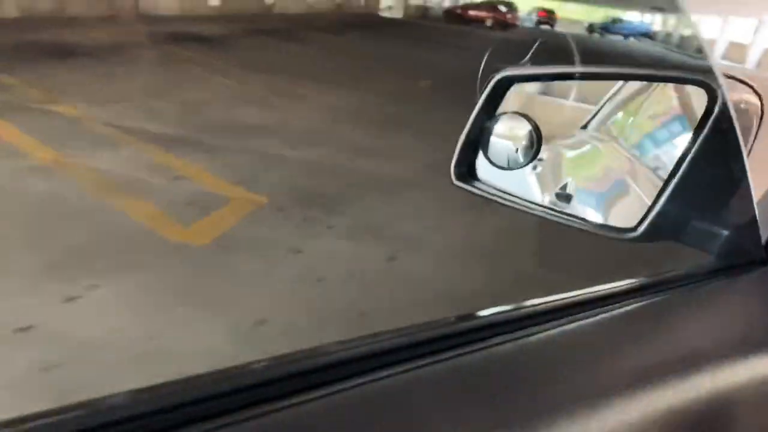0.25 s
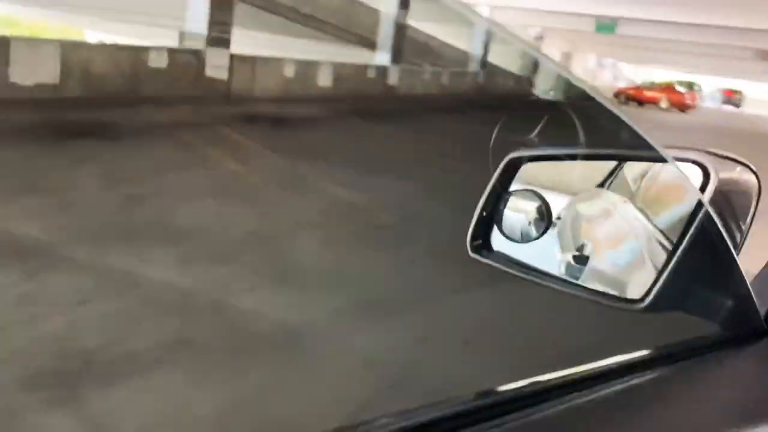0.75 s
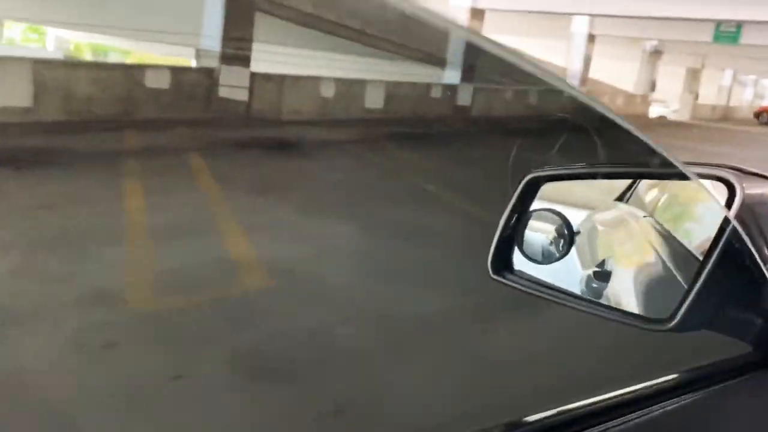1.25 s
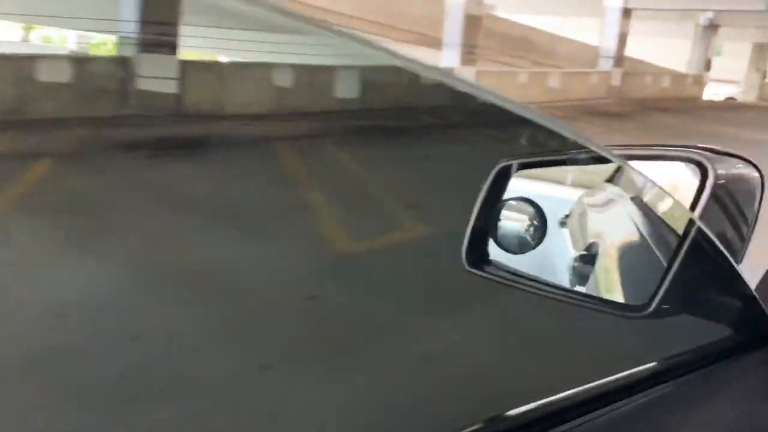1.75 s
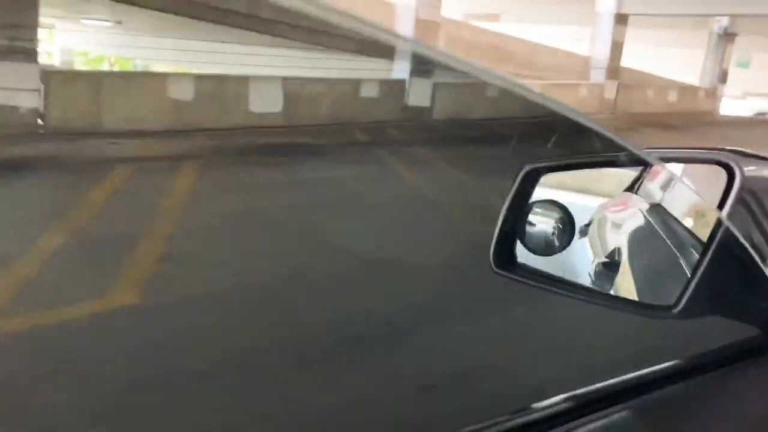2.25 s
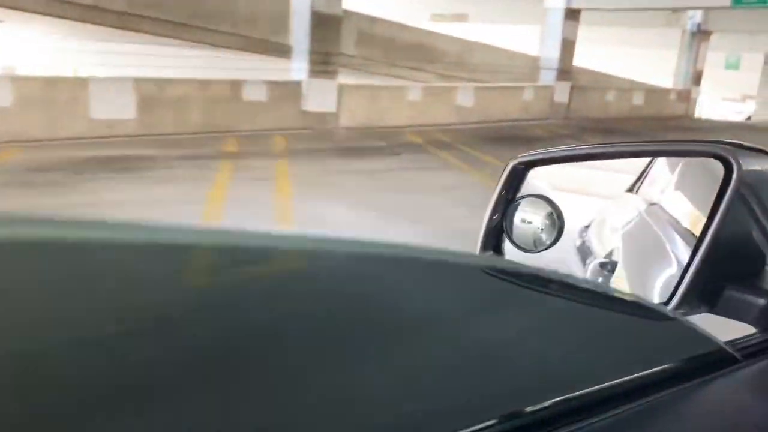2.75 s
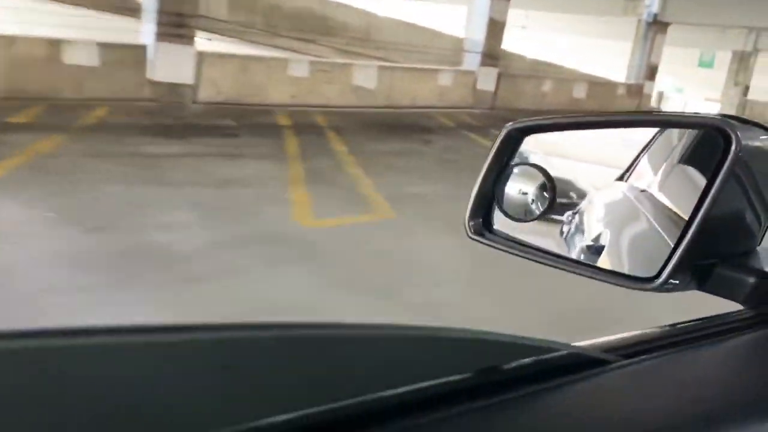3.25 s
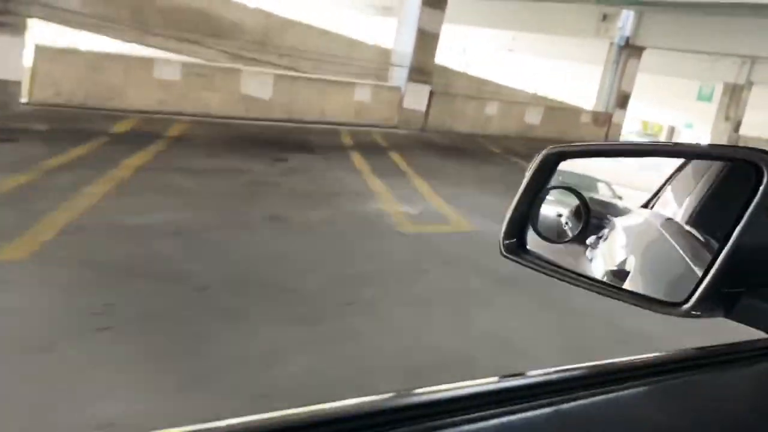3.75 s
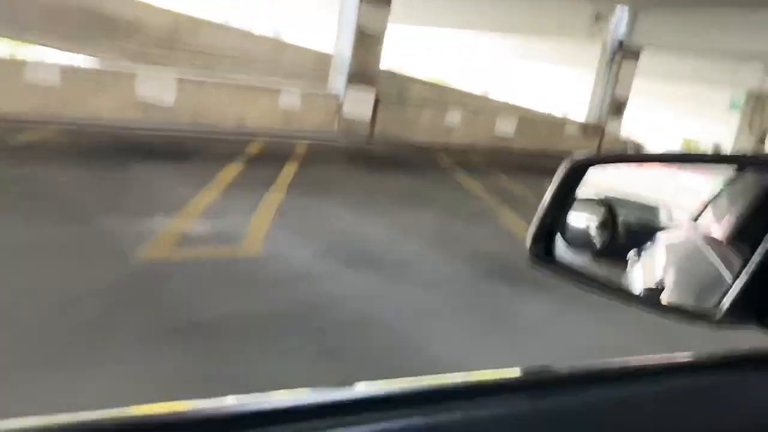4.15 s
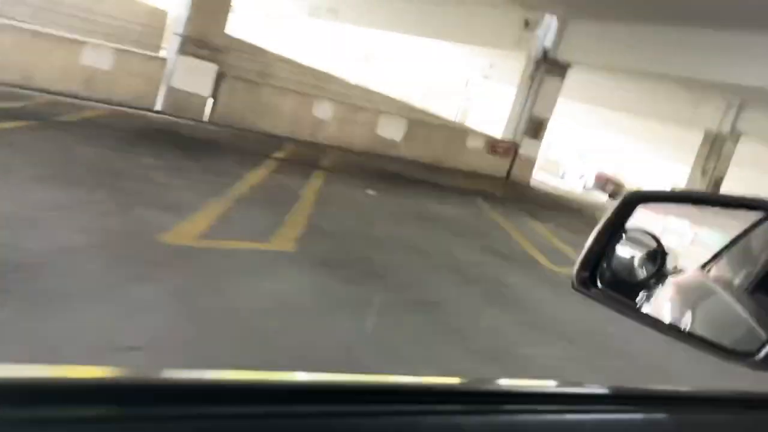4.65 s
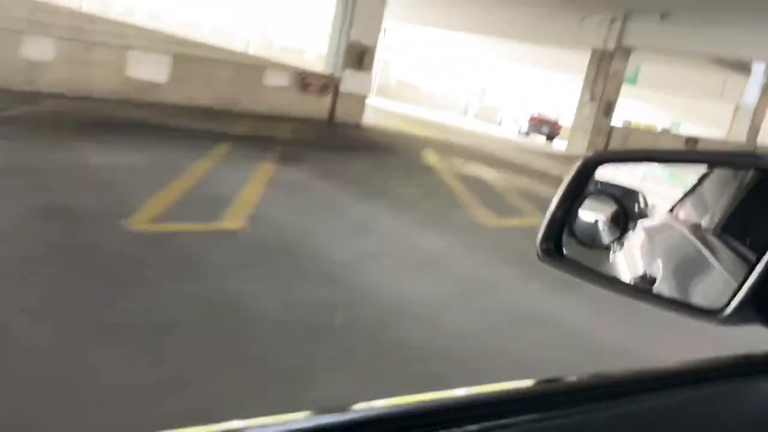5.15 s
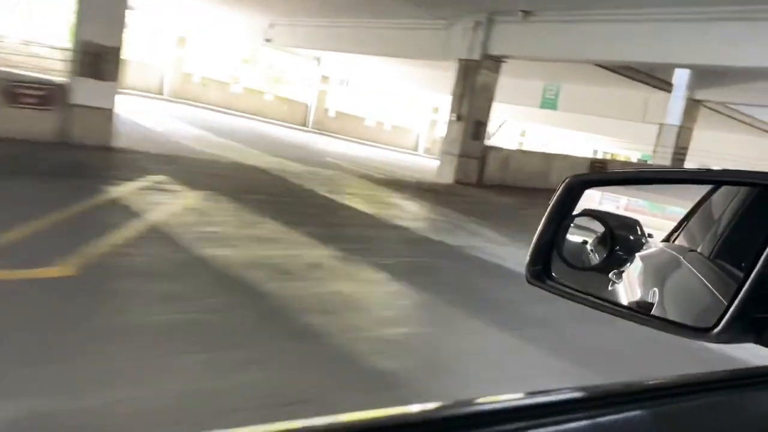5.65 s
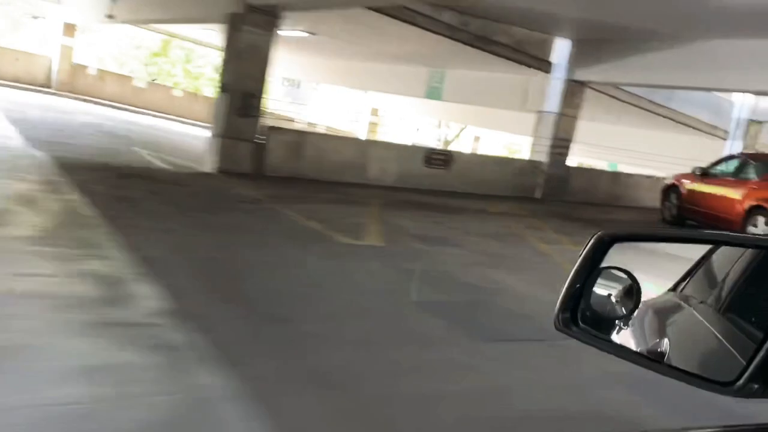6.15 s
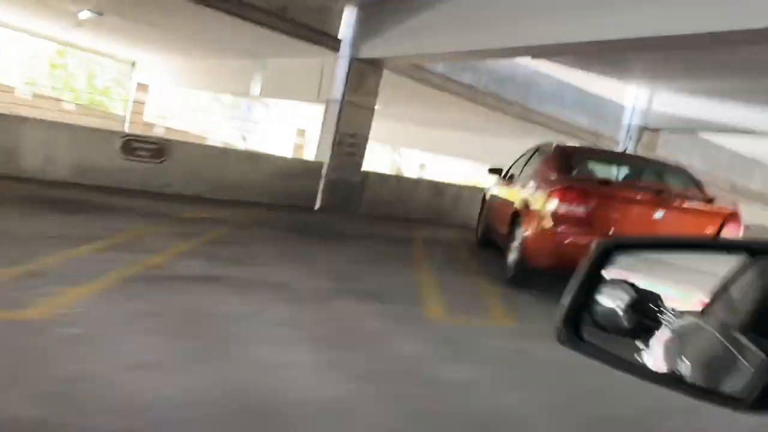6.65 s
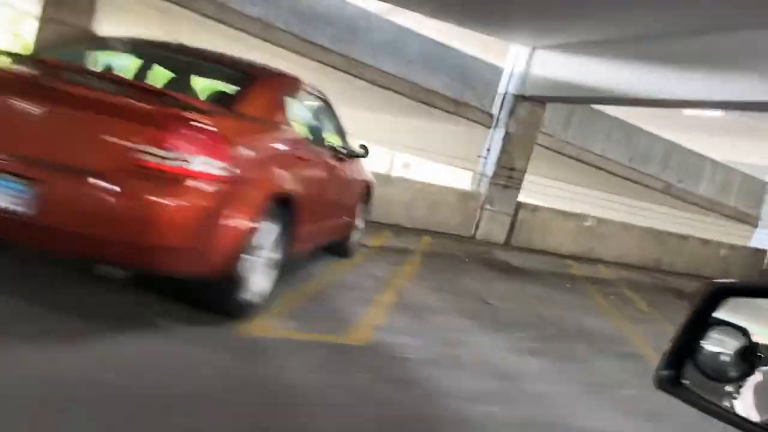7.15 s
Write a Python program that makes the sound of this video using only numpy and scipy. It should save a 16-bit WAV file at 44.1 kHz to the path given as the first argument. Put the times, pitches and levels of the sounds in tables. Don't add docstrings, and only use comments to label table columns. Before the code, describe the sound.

A close stereo microphone in the cabin first catches irregular wind-like thumps over a low, muffled car engine. A few plastic clicks follow and the window opens, making the sound brighter and wider. The exhaust note climbs steadily with roaring gas and rumbling tyres, peaks off the concrete walls as a pillar whooshes past, softens as the throttle lifts, then growls again while slowly dropping in pitch.

```python
import sys
import numpy as np
from scipy import signal
from scipy.fft import rfft, irfft, next_fast_len
from scipy.io import wavfile

SR = 44100
rng = np.random.default_rng(int(sys.argv[2]) if len(sys.argv) > 2 else 0)


def generate_wav(sig):
    pcm = np.round(np.clip(np.atleast_2d(sig).T, -1, 1) * 32767).astype(np.int16)
    wavfile.write(sys.argv[1], SR, pcm)


def makeup_ratio(level_db):
    decades = np.asarray(level_db, float) / 20
    return 10 ** decades


N = 325884
TIME_S = np.arange(N) / SR
SEAL_S, OPEN_S, DOWN_S = 2.17, 3.393, 3.66


def rms_one(x):
    return x / np.sqrt(np.mean(x ** 2) + 1e-20)


def in_time(rows):
    s, *columns = np.transpose(rows)
    return [np.interp(TIME_S, s, column) for column in columns]


def passing_db(events):
    return sum(db * np.exp(-((TIME_S - s) / half_s) ** 2) for s, db, half_s in events)


def drift(rate_hz):
    step = 40
    r = np.exp(-2 * np.pi * rate_hz * step / SR)
    points = rng.standard_normal(N // step + 2002)
    slow = signal.lfilter([1], [1, -2 * r, r * r], points)[2000:]
    return np.interp(np.arange(N) / step, np.arange(len(slow)), rms_one(slow))


def resonance(x, hz, width_hz):
    r = np.exp(-np.pi * width_hz / SR)
    ringing = [1, -2 * r * np.cos(2 * np.pi * hz / SR), r * r]
    return signal.lfilter(np.array([1, 0, -1]) * (1 - r * r) / 2, ringing, x)


def coloured(spectrum):
    hz, db = np.transpose(spectrum)
    size = next_fast_len(N)
    octave = np.log2(np.maximum(np.fft.rfftfreq(size, 1 / SR), 1))
    beyond = np.maximum(np.log2(hz[0]) - octave, 0) + np.maximum(octave - np.log2(hz[-1]), 0)
    shape = makeup_ratio(np.interp(octave, np.log2(hz), db) - 26.5 * beyond)
    return rms_one(irfft(rfft(rng.standard_normal((2, size))) * shape, size)[:, :N])


def pop(start_hz, t60_s, rattle):
    t = np.arange(SR // 20) / SR
    turn = 2 * np.pi * np.cumsum(150 + start_hz * np.exp(-t / .003)) / SR
    thud = np.sin(turn) * (1 - np.exp(-t / .003)) * makeup_ratio(-60 * t / t60_s)
    edge = rattle * makeup_ratio(-60 * t / 0.051)
    for _ in range(2):
        edge = resonance(edge, start_hz, 820)
    return thud / np.abs(thud).max() + makeup_ratio(-14) * edge / np.abs(edge).max()


# (time [s], peak level [dB])
POPS = [(0.014, -22), (0.079, -20.5), (0.105, -22.5), (0.117, -24.5), (0.158, -15), (0.19, -29),
        (0.216, -26), (0.253, -24), (0.318, -30), (0.369, -15.5), (0.4, -25.5), (0.551, -19),
        (0.561, -22.5), (0.713, -22.5), (0.783, -23.5), (0.819, -20), (0.874, -23), (0.889, -17.5),
        (0.991, -22), (1.022, -20.5), (1.049, -24.5), (1.068, -21), (1.301, -23.5), (1.319, -28),
        (1.44, -24.5), (1.444, -20.5), (1.711, -30.5), (2.147, -19.5), (2.656, -37), (2.783, -27)]


def air():
    length = SR // 20
    out = np.zeros(N + SR)
    for (s, db), rattle in zip(POPS, rng.standard_normal((len(POPS), length))):
        start = round(s * SR)
        out[start:start + length] += makeup_ratio(db - 1.5) * pop(767, 0.05, rattle)
    flutter_per_s, fade_s = 45, 1.2
    born = rng.random(N) < flutter_per_s * np.exp(-(TIME_S / fade_s) ** 2) / SR
    sizes = makeup_ratio(-45 + 7.0 * np.minimum(rng.exponential(1, N), 2)) * rng.choice([-1, 1], N)
    small_pop = pop(706, 0.095, rng.standard_normal(length))
    return out[:N] + signal.fftconvolve(born * sizes, small_pop)[:N]


# (time [s], firing rate [Hz], throttle level [dB], gas flow level [dB])
ENGINE = [(0, 42.93, 3, 2.5), (1.5, 43.5, -1.5, 4.5), (2.95, 43.63, 0.5, 4.5), (3.36, 47.16, -2.5, -9),
          (3.56, 49.03, -2, 4), (4.25, 58.3, -1.5, 0.5), (4.68, 63.68, 1, 2), (4.9, 67.88, 2, 9.5),
          (5.32, 79, 4, 7.5), (5.56, 80.87, 1, 11), (5.88, 102.8, -1, 13), (6.08, 106.3, 5, 10.5),
          (6.4, 100.5, -6, -4.5), (6.83, 100.1, -9, -12), (6.91, 99, 1, -4), (7.15, 95, 2.5, 0.5),
          (7.32, 88.7, 5, 4.5), (7.39, 85.65, 3.5, 2.5)]


def engine():
    firing_hz, throttle_db, flow_db = in_time(ENGINE)
    lag_s = .11
    keep = np.exp(-1 / (lag_s * SR))
    return firing_hz, throttle_db, signal.lfilter([1 - keep], [1, -keep], flow_db)


def octaves_up():
    firing_hz = engine()[0]
    return np.log2(firing_hz / firing_hz[0])


# (frequency [Hz], level per Hz [dB])
RUMBLE = [(12, -66.5), (20, -32.5), (41, 0.5), (60, 9), (91, 7), (109, 8), (150, 4.5), (319, -8.5),
          (400, -29), (520, -56), (880, -120)]
# (frequency [Hz], level per Hz [dB])
HISS = [(4500, 1), (6500, -1.5), (8000, -4.5), (10000, -3.5), (12000, -15), (14000, -5.5), (15900, -9.5)]
# (time [s], level [dB], half length [s])
BUMPS = [
    (0.356, 4.5, 0.12),
    (2.758, 0.5, .1),
    (4.052, 2, 0.065),
    (5.474, 8, 0.054),
    (6.256, -5.5, 0.2),
    (7.302, 7.5, .15),
]
# (time [s], level [dB], half length [s])
SWISHES = [
    (0.863, 6, 0.1),
    (5.04, -3, .12),
    (6.007, 16, 0.15),
    (7.385, 11.5, 0.011),
]


def road():
    unsealed, speed = TIME_S > SEAL_S, octaves_up()
    rumble_db = -29 + 2 * speed + 5 * unsealed + passing_db(BUMPS) + 2.3 * drift(7.6)
    hiss_db = -64.5 + 7.5 * speed + 4 * unsealed + passing_db(SWISHES) + .8 * drift(11)
    return makeup_ratio(rumble_db) * coloured(RUMBLE) + makeup_ratio(hiss_db) * coloured(HISS)


def window():
    gap = np.clip((TIME_S - SEAL_S) / (OPEN_S - SEAL_S), 0, 1)
    shut_db = -14
    return shut_db * (1 - gap ** 2.83)


def layer_db(db, window_share, throttle_share, flow_share):
    _, throttle_db, flow_db = engine()
    return db + window_share * window() + throttle_share * throttle_db + flow_share * flow_db


# (time [s], frequency [Hz], level against the roar [dB])
JET = [(2.6, 1660, -6), (3.5, 1675, -3.5), (4.5, 1661, -3), (5.4, 1384, -15.5), (5.97, 1971, -5),
       (6.3, 1728, -17.5), (7.0, 1400, 0.5)]


def jet(width_hz):
    hz, db = in_time(JET)
    lowpass = signal.butter(2, width_hz / 2, fs=SR, output="sos")
    slow = signal.sosfilt(lowpass, rng.standard_normal((2, 2, N)))
    turn = 2 * np.pi * np.cumsum(hz) / SR
    return makeup_ratio(db) * rms_one(slow[0] * np.cos(turn) + slow[1] * np.sin(turn))


def ringing_pipe(blast, modes):
    return sum(makeup_ratio(db) * rms_one(resonance(resonance(blast, hz, width_hz), hz, width_hz))
               for hz, width_hz, db in modes)


# (frequency [Hz], width [Hz], level [dB])
PIPE = [(434, 43, -3.5), (614, 87, 4.5), (761, 210, 0)]
# (frequency [Hz], width [Hz], level [dB])
TIP = [(2480, 160, 0)]
# (frequency [Hz], level per Hz [dB])
THROB = [(140, -13), (230, -8.5), (310, -0.5), (370, -7.5), (480, -2.5), (620, -3), (800, -8), (1050, -10),
         (1300, -7.5)]
# (frequency [Hz], level per Hz [dB])
ROAR = [(530, -35), (900, -5.5), (1010, -3), (1720, 0), (2170, -4.5), (2450, -6.5), (4500, -22.5),
        (5850, -57.5), (9900, -120)]
# (frequency [Hz], level per Hz [dB])
RASP = [(2400, 5), (3200, 1.5), (4500, -4), (5500, -8.5), (6800, -12), (8000, -21)]


def exhaust_noise(turn, throb_db):
    ring_db = layer_db(-28, 1.8, 1.16, -0.55)
    roar_db = layer_db(-28, 1.67, -0.0934, 0.5862)
    rasp_db = layer_db(-39.5, 1.3, 0.62, 1.1149)
    gate = 1 + 0.33 * np.cos(turn + 0.9 * drift(7.6))
    blast = rng.standard_normal((2, N)) * gate
    throb = makeup_ratio(throb_db + 1.8 * drift(9)) * gate * coloured(THROB)
    ring = makeup_ratio(ring_db - 1.5) * ringing_pipe(blast, PIPE)
    roar = coloured(ROAR) + makeup_ratio(-27.0) * ringing_pipe(blast, TIP) + jet(width_hz=390)
    roar = makeup_ratio(roar_db + 0.5 * drift(14)) * roar
    rasp = makeup_ratio(rasp_db + 1.1 * drift(15)) * coloured(RASP)
    return throb + ring + (roar + rasp) * (1 + 0.031 * np.cos(turn + drift(1.7)))


# (frequency [Hz], width [Hz], level [dB])
CABIN = [(64, 17, 2.5), (77.8, 24, 3.5), (102.2, 23, 3), (124.9, 9.9, -0.5), (145, 21, 1.5),
         (170.6, 14, -3.5), (197, 33, -3), (219, 12, 1), (250, 12, -6), (317, 41, -2), (420, 69, 1)]


def cabin_db(hz):
    power = sum(makeup_ratio(2 * db) / (1 + (2 * (hz - top) / width_hz) ** 2) ** 2 for top, width_hz, db in CABIN)
    floor_db = -14.5
    return 10 * np.log10(power + makeup_ratio(2 * floor_db))


def wall_ahead(firing_hz):
    near = np.interp(TIME_S, [5.5, 5.9], [0, 1])
    travel_m, null_s = .074, 6.44
    approach = 4 * np.pi * np.cumsum(travel_m * firing_hz ** 2) / (343 * SR)
    return near, approach - approach[int(null_s * SR)] + np.pi


# (multiple of firing rate, level [dB], share of window loss,
# share of throttle, step once the glass is fully down [dB])
ORDERS = [(1, -17.5, 0.6, 0.17, -0.86), (2, -17, 0.98, 0.88, 4.5), (3, -15, 0.24, 0.92, -2),
          (4, -19.5, 0.47, 0.68, -4.5)]
# (multiple of firing rate, level [dB])
HALF_ORDERS = [(.5, -16), (1.5, -7.5), (2.5, -11.5), (3.5, -7)]
# (multiple of firing rate, level against the throb [dB])
HIGH_ORDERS = [(5, -12), (6, -11), (7, -12), (8, -12), (9, -14), (10, -14)]


def firing_note(turn, throb_db):
    firing_hz, throttle_db, _ = engine()
    near, approach = wall_ahead(firing_hz)
    shut_db = window()
    sealed_db = -7.5 * (TIME_S < SEAL_S)
    down = np.interp(TIME_S, [DOWN_S - .04, DOWN_S], [0, 1])
    heard_db = np.interp(TIME_S, [.95, 1.05], [-40, 0])

    def order(k, db, wobble, rate_hz=4):
        level = np.sqrt(2) * makeup_ratio(db + 2.87 * wobble * drift(rate_hz))
        phase = k * turn + k * k + wobble * drift(rate_hz)
        echo = makeup_ratio(-5.5) * near * np.sin(phase + k * approach)
        return level * (np.sin(phase) + echo)

    note = np.zeros(N)
    for k, db, window_share, throttle_share, step_db in ORDERS:
        k = round(k)
        upper = near * (k > 1.5)
        order_db = db + window_share * (shut_db + sealed_db) + throttle_share * throttle_db
        order_db = order_db + cabin_db(k * firing_hz) + heard_db + step_db * down - 4.5 * upper
        note += order(k, order_db, wobble=k / 10 * (1 + 3.3 * upper))
    uneven_db = -23 + 0.56 * shut_db + 0.66 * throttle_db
    for k, db in HALF_ORDERS:
        note += order(k, uneven_db + db, wobble=1.0)
    for k, db in HIGH_ORDERS:
        note += order(k, throb_db + db + 1.5 - 2 * near, wobble=.7 + near, rate_hz=12)
    return note


def garage(x):
    t = np.arange(int(1.5 * SR)) / SR
    t60_s, first_echo_s = 2, .012
    tail = rng.standard_normal((2, len(t))) * makeup_ratio(-60 * t / t60_s) * (t > first_echo_s)
    return signal.fftconvolve(x[None], tail / np.sqrt(np.sum(tail[0] ** 2)), axes=1)[:, :N]


def exhaust():
    turn = 2 * np.pi * np.cumsum(engine()[0] * (1 + 0.003935 * drift(4.98))) / SR
    throb_db = layer_db(-24.5, 1.06, 1.29, 0.13)
    note = firing_note(turn, throb_db)
    return note + makeup_ratio(-10) * garage(note) + exhaust_noise(turn, throb_db)


# (time [s], peak level [dB], frequency [Hz])
TICKS = [(1.43, -55.5, 6870), (1.519, -41, 4880), (1.598, -44.5, 2100), (2.132, -43, 11100),
         (2.147, -26, 1455), (2.158, -51, 9660), (2.323, -47, 9800), (2.34, -38, 10800), (2.343, -33, 7140),
         (2.346, -27, 3800), (2.353, -42, 7000), (7.285, -34, 4040)]


def ticks():
    out, t = np.zeros(N + SR), np.arange(SR // 20) / SR
    for (s, db, hz), noise in zip(TICKS, rng.standard_normal((len(TICKS), len(t)))):
        click = noise * makeup_ratio(-60 * t / .014)
        for _ in range(2):
            click = resonance(click, hz, hz * 1.5)
        start = round(s * SR)
        out[start:start + len(t)] += makeup_ratio(db) * click / np.abs(click).max()
    return out[:N]


def boom():
    peak_s, rise_s, fall_s, hz = 6.76, 0.36, 0.078, 103
    swell = np.exp(-((TIME_S - peak_s) / np.where(TIME_S < peak_s, rise_s, fall_s)) ** 2)
    return np.sqrt(2) * makeup_ratio(-21.5) * swell * np.sin(2 * np.pi * hz * TIME_S)


def scene():
    return air() + road() + exhaust() + ticks() + boom()


# (frequency [Hz], likeness [0-1], left lead [rad], left-right level [dB])
PORTS = [(60, .97, .32, 0), (170, .92, .6, -1), (300, .8, .85, 2.5), (520, .7, .9, 2), (860, .35, 1.2, 2.5),
         (1200, .12, 3.5, 3), (1550, .45, 5.4, 1), (2200, .62, 6, 2.5), (3200, .52, 7.1, 3.5),
         (4600, .42, 6.9, 3.5), (6700, .5, 6.4, 1), (7700, .45, 4.4, .5), (8300, .1, 3.1, 0)]


def two_ports(first, second, f):
    log_hz = np.log(np.array(PORTS)[:, 0])
    _, alike, lead, tilt_db = (np.interp(np.log(f), log_hz, column) for column in np.transpose(PORTS))
    alike = np.clip(alike, 0, 1)
    left = first * np.exp(.5j * lead) * makeup_ratio(tilt_db / 2)
    apart = 1j * (first - second) / np.sqrt(2)
    right = alike * first + np.sqrt(1 - alike ** 2) * np.where(f > 300, second, apart)
    return left, right * np.exp(-.5j * lead) * makeup_ratio(-tilt_db / 2)


# (from [Hz], to [Hz])
MID_GAPS = [(8350, 8850), (11500, 12700), (15200, 17000)]
# (from [Hz], to [Hz])
SIDE_GAPS = [(9550, 11000), (13200, 14500), (15800, 17000)]


def thin_treble(left, right, f):
    mid, side = left + right, left - right
    for low, high in MID_GAPS:
        outside = (f < low) | (f > high)
        mid, side = mid * outside, side * np.where(outside, 1, np.sqrt(2))
    for low, high in SIDE_GAPS:
        outside = (f < low) | (f > high)
        side, mid = side * outside, mid * np.where(outside, 1, np.sqrt(2))
    return np.array([mid + side, mid - side]) / 2


def low_pass(x):
    return signal.sosfilt(signal.butter(12, 15970, fs=SR, output="sos"), x)


def record(dry):
    size = next_fast_len(N + SR)
    f = np.maximum(np.fft.rfftfreq(size, 1 / SR), 1)
    first, second = rfft(dry, size)
    left, right = two_ports(first, second, f)
    whole = irfft(np.where(f > 7000, first, np.array([left, right])), size)[:, :N]
    x = irfft(thin_treble(left, right, f), size)[:, :N]
    clicking = sum(np.exp(-((TIME_S - s - .003) / .006) ** 4) for s, db, hz in TICKS if hz > 6000)
    x = x + clicking.clip(0, 1) * (whole - x)
    return low_pass(0.96 * np.tanh(x / 0.98))


dry = scene()
out = record(dry)
generate_wav(out)
```